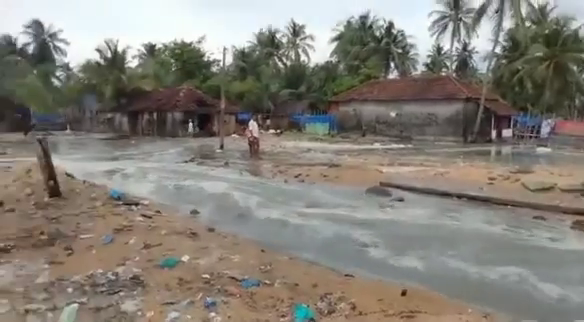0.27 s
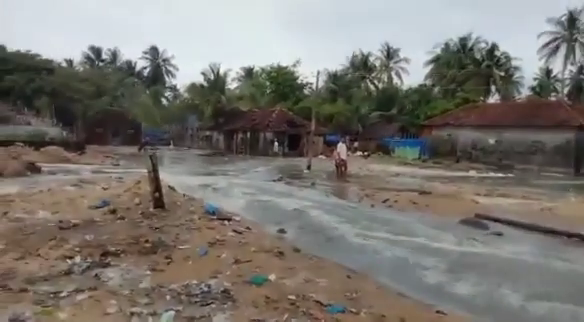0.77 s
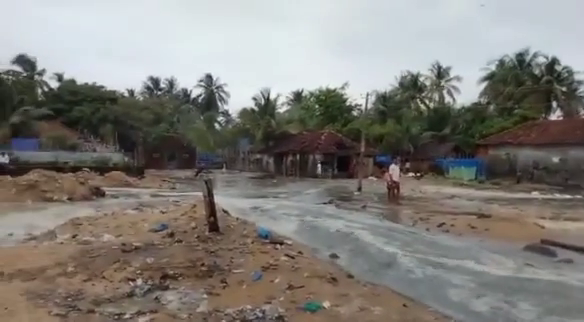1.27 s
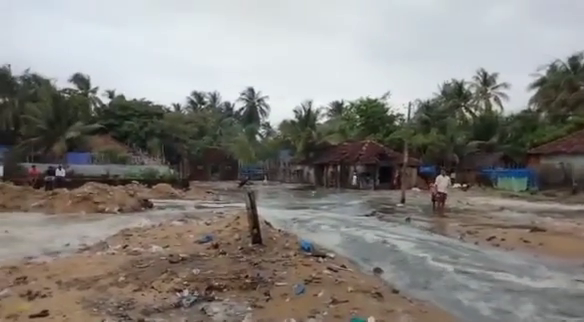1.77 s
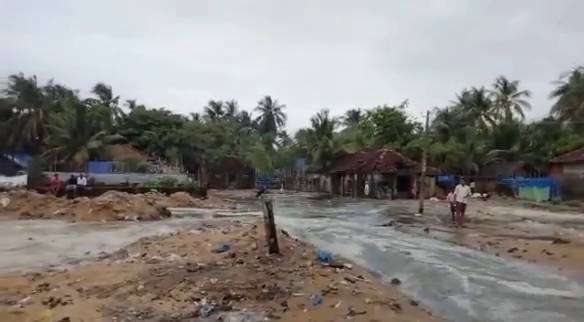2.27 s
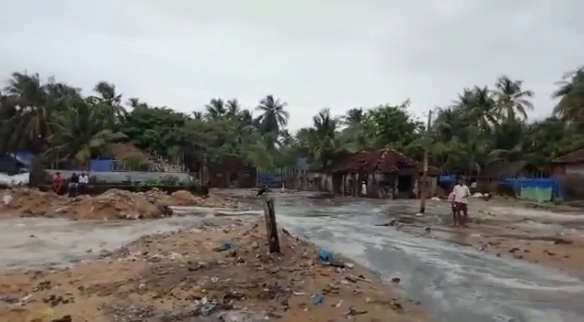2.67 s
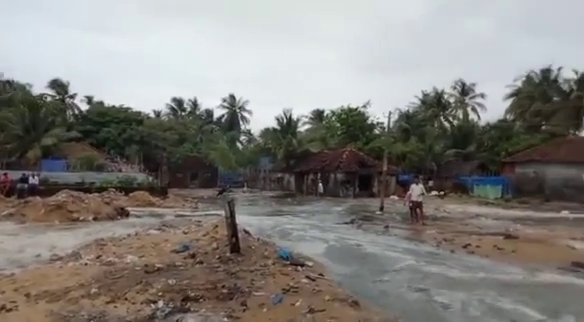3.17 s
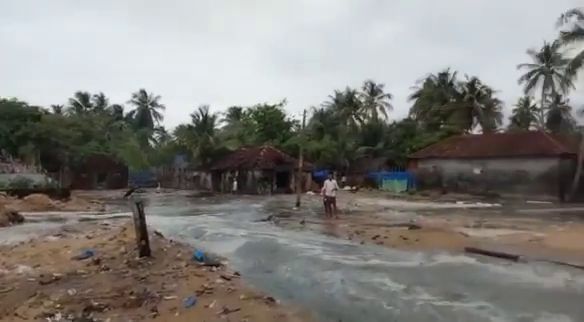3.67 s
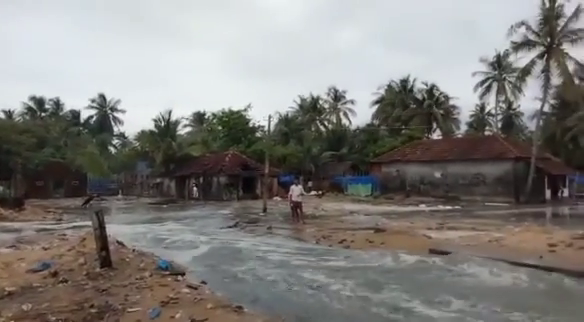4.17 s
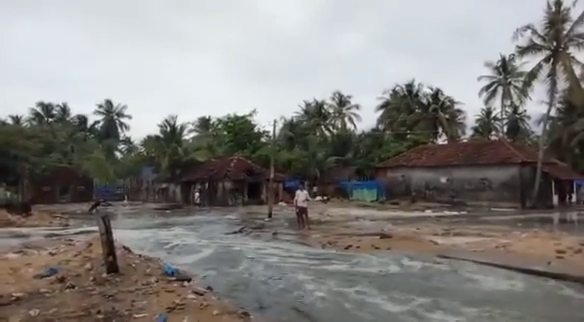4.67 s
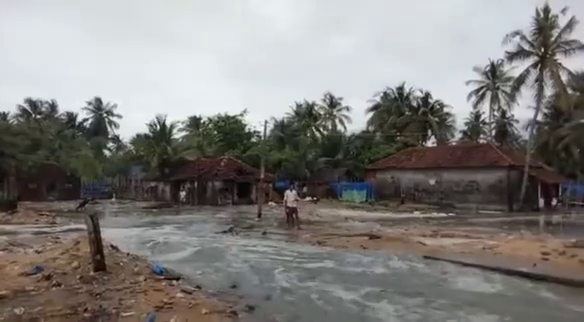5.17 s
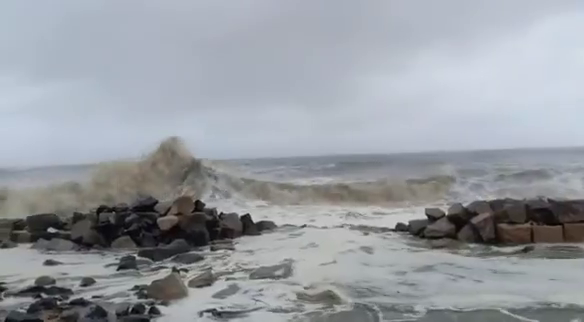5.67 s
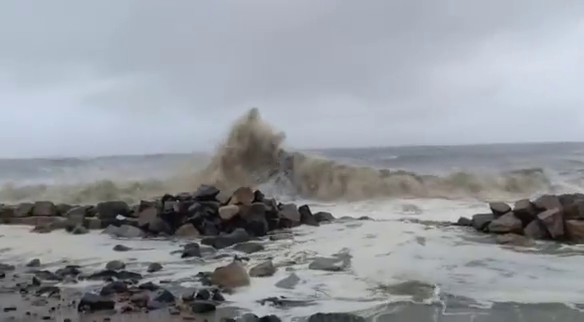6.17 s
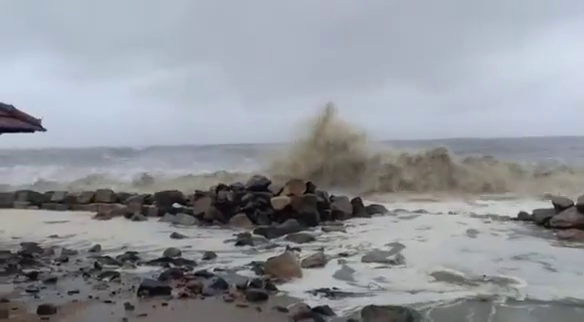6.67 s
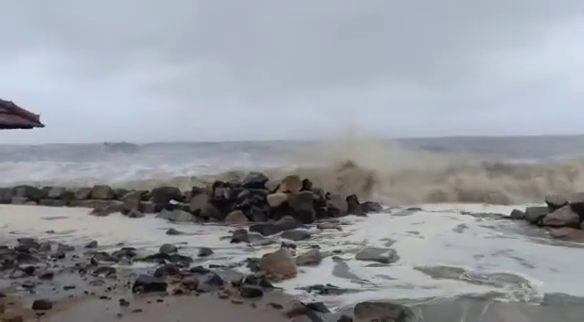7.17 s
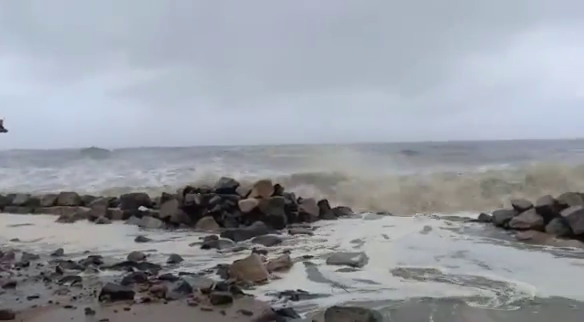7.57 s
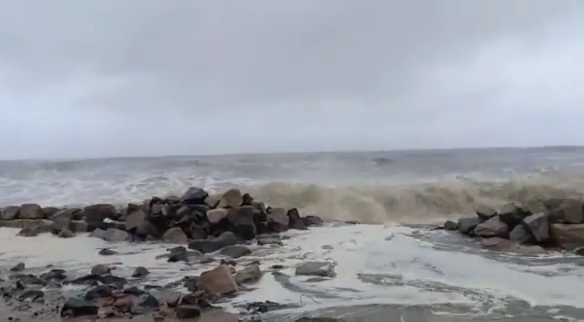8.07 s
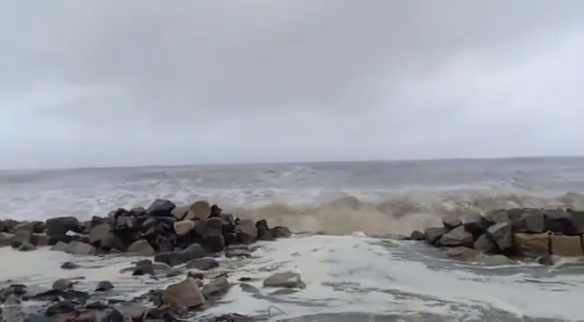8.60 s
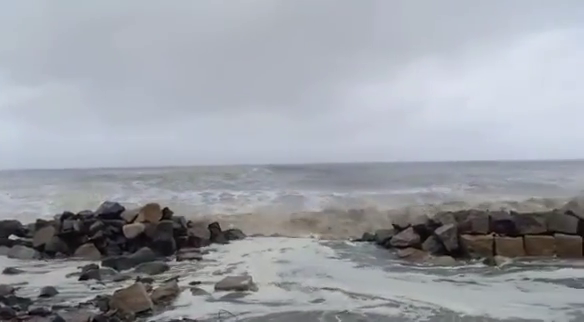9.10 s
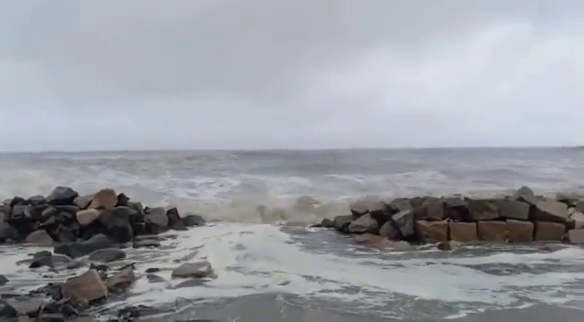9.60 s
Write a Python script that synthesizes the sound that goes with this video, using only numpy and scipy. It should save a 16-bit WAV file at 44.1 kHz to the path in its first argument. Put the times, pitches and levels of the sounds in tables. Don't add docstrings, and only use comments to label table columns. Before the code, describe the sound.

A wave surges and hisses over sand while a crow caws five times, then an abrupt cut to a duller, wind-rumbled roar of distant surf.

```python
import sys
import numpy as np
from scipy import signal
from scipy.fft import rfft, irfft, next_fast_len
from scipy.io import wavfile
from scipy.ndimage import uniform_filter1d

SR = 44100
rng = np.random.default_rng(int(sys.argv[2]) if len(sys.argv) > 2 else 0)


def gain_from_decibels(decibels):
    exponent = np.asarray(decibels, float) / 20
    return 10 ** exponent


def digitize_waveform(pressure):
    field = np.atleast_2d(pressure).T
    bounded = np.clip(field, -1, 1)
    quanta = np.round(bounded * 32767).astype(np.int16)
    wavfile.write(sys.argv[1], SR, quanta)


N = 433944
CUT_S = 5.218
TURN_S = 5.3
COARSE = 64


def wave():
    # f/Hz, density/dB per Hz
    colour = [(25, -33), (48, -26.5), (117, -3), (190, -0.5), (300, -3), (700, -10.5), (2150, -10),
              (3740, -15.5), (5000, -24.5), (6800, -31.5), (8250, -26), (12800, -40.5), (14800, -42),
              (15800, -41.5)]
    # low f/Hz, high f/Hz
    bands_hz = [(60, 160), (200, 480), (600, 1100), (2700, 4600), (6500, 9500), (10500, 15500)]
    top_hz = 15900
    size = next_fast_len(int(TURN_S * SR))
    hz = np.maximum(np.arange(size // 2 + 1) * SR / size, 1)
    spectrum = foam(size, burst_db=0.88) * gain_from_decibels(on_log(hz, colour)) * (hz < top_hz)
    t = np.arange(size) / SR
    x = surf(spectrum[None], hz, wave_levels(), bands_hz, t, shared_db=.5, flicker_db=.7, gusty_db=1.0)
    return np.pad(x[0], (0, N - size))


def wave_levels():
    # t/s, force over calm water/dB
    surge = [(0.0, -7), (1.55, -5), (1.85, 3), (2.08, 5), (2.22, 10.5), (2.36, 10.5), (2.73, 14.5),
             (2.9, 15), (3.12, 16), (3.3, 14), (3.45, 12.5), (3.8, 11.5), (4.1, 9.5), (4.4, 2.5),
             (4.7, -5.5), (5.2, -9)]
    # calm level/dB, level at force 0/dB, gain/dB per dB of force, lead/s, backwash level/dB
    layers = [
        (-47, -50.5, 0.68, .1, -60),
        (-40.5, -37, .9, .03, -47),
        (-41.5, -44, 1.0445, -0.055, -44.5),
        (-42.5, -42, 1.07, -0.0003, -33.5),
        (-55, -50.5, 1.047, -0.018, -52.5),
        (-63, -61, 1.3, 0.074, -72),
    ]
    # t/s, boom level/dB, spray level/dB
    slaps = [(.14, -35, -71), (.46, -35.5, -60), (.88, -29.5, -58), (1.1, -23.5, -68), (1.28, -28, -71),
             (1.56, -25.5, -67), (1.7, -25, -51.5), (1.84, -33, -41), (2.08, -29.5, -42.5), (2.2, -32, -41),
             (2.58, -32, -36), (2.99, -28.5, -48), (3.88, -43, -53), (4.43, -40, -64), (5.03, -33.5, -54)]
    slap_rise_db_s, slap_fall_db_s = 91, 36
    slap_mist_db = -9.5
    backwash_s, backwash_rise_db_s = 4.94, 6.5
    s = np.arange(0, TURN_S, .01)
    drain = peak(s, backwash_s, 0, backwash_rise_db_s, 0)
    surge_s, surge_db = np.transpose(surge)
    levels = []
    for calm, base, share, lead, back in layers:
        force = np.interp(s + lead, surge_s, surge_db)
        levels.append(together(calm, base + share * force, back + drain))
    boom, *middle, spray, mist = levels
    booms = [peak(s, when, db, slap_rise_db_s, slap_fall_db_s) for when, db, _ in slaps]
    sprays = [peak(s, when, db, slap_rise_db_s, slap_fall_db_s) for when, _, db in slaps]
    boom = together(boom, *booms)
    mist = together(mist, *[db + slap_mist_db for db in sprays])
    spray = together(spray, *sprays)
    return np.transpose([s, boom, *middle, spray, mist])


def sea():
    # f/Hz, density/dB per Hz
    colour = [(25, -37), (60, -8), (110, -1), (230, -7), (370, -14.5), (640, -12.5), (1500, -23),
              (1950, -20), (2550, -18), (3400, -29), (4300, -29), (5400, -27.5), (7000, -39), (9700, -51)]
    # low f/Hz, high f/Hz
    bands_hz = [(40, 250), (400, 1000), (1700, 3000), (4000, 7500)]
    # f/Hz, width/Hz, level/dB
    port_rings = [(11400, 700, 7), (13500, 800, 9), (15300, 500, 6)]
    # f/Hz, power share heard alike, power share from the right, left minus right level/dB
    ports = [(60, 0.93, 0.076, 0.5), (250, 0.95, 0.0054, 1), (448, 0.76, 0.0033, -0.5),
             (880, 0.64, 0.19, 0.5), (1400, 0.1, 0.32, 0), (2430, 0.064, 0.21, 2), (4360, 0, 0.23, 0),
             (5730, 0.081, 0.16, -9.5), (7000, 0, 0.12, -4.5), (9000, 0.031, .12, -1)]
    port_lag_s, top_hz = .000488, 15500
    first = int(TURN_S * SR)
    size = next_fast_len(N - first)
    hz = np.maximum(np.arange(size // 2 + 1) * SR / size, 1)
    alike = np.clip(on_log(hz, ports, axis=1), 0, 1)
    lateral = np.clip(on_log(hz, ports, axis=2), 0, 1)
    apart = np.sqrt(np.clip(1 - alike - lateral, 0, 1))
    front = np.sqrt(alike) * foam(size, burst_db=0.8)
    right = np.sqrt(lateral) * foam(size, burst_db=1.1)
    late = right * np.exp(-2j * np.pi * hz * port_lag_s)
    left_port = front + late + apart * foam(size, burst_db=1.8)
    right_port = front + right + apart * foam(size, burst_db=0.0)
    colour_db = on_log(hz, colour)
    for ring_hz, width_hz, db in port_rings:
        colour_db = colour_db + db / (1 + (2 * (hz - ring_hz) / width_hz) ** 2)
    balance_db = np.outer([.5, -.5], on_log(hz, ports, axis=3))
    ears = np.array([left_port, right_port]) * (hz < top_hz) * gain_from_decibels(colour_db + balance_db)
    t = (first + np.arange(size)) / SR
    x = surf(ears, hz, sea_levels(), bands_hz, t, shared_db=.4, flicker_db=.6, gusty_db=1.3)
    return np.pad(x[:, :N - first], ((0, 0), (first, 0)))


def sea_levels():
    # t/s, force/dB, wind level/dB
    breakers = [(5.6, 0.5, -35.5), (5.84, 0, -31.5), (6.2, 1.5, -34), (6.5, 2, -33.5), (6.8, 4.5, -32.5),
                (7.04, 2, -32), (7.24, 2, -29.5), (7.7, 1, -31), (8.24, -0.5, -31), (8.44, 0, -29),
                (8.64, 0, -32.5), (9.0, -1, -29.5), (9.3, 0, -31.5), (9.62, -0.5, -28.5), (9.84, 1.5, -31)]
    # level at force 0/dB, gain/dB per dB of force
    layers = [
        (-42.5, 1.07),
        (-42.5, 0.84),
        (-49, 1.2),
    ]
    s, force, wind_db = np.transpose(breakers)
    return np.transpose([s, wind_db] + [base + share * force for base, share in layers])


def surf(spectra, hz, curves, bands_hz, t, shared_db, flicker_db, gusty_db):
    s, *levels = np.transpose(curves)
    power = np.mean(np.abs(spectra) ** 2, axis=0) * 2 / len(t) ** 2
    own_db = [10 * np.log10(power[(hz > lo) & (hz < hi)].sum()) for lo, hi in bands_hz]
    gains_db = np.array(levels) - np.array(own_db)[:, None]
    centres = np.log2(25) + np.arange(30) / 3
    heave = uniform_filter1d(walk(3, count=30), size=7, axis=0) * np.sqrt(7)
    flicker = walk(14, count=30)
    gust = walk(22, count=1)[0]
    coarse_s = np.arange(heave.shape[1]) * COARSE / SR
    curve = np.arange(len(levels))
    band_octaves = np.log2(bands_hz).mean(axis=1)
    out = 0
    for k, c in enumerate(centres):
        place = np.clip(1 - np.abs(curve - np.interp(c, band_octaves, curve)), 0, 1)
        bass = np.clip(np.log2(400) - c, 0, 1)
        wobble = shared_db * heave[k] + flicker_db * flicker[k] + gusty_db * gust * bass
        gain = np.interp(t, coarse_s, gain_from_decibels(np.interp(coarse_s, s, place @ gains_db) + wobble))
        window = np.cos(np.pi / 2 * np.clip(3 * (np.log2(hz) - c), -1, 1)) ** 2
        out = out + gain * irfft(spectra * window, len(t))
    return out


def foam(size, burst_db):
    patches = np.repeat(rng.exponential(1, size // 32 + 1), 32)[:size]
    patches = uniform_filter1d(patches, 32)
    return rfft(rng.standard_normal(size) * gain_from_decibels(burst_db * patches))


def walk(rate, count):
    k = int(SR / rate / COARSE)
    w = np.repeat(rng.standard_normal((count, N // COARSE // k + 2)), k, axis=1)
    w = uniform_filter1d(uniform_filter1d(w, k), k)
    return w[:, :N // COARSE + 1] / w.std()


def on_log(hz, table, axis=1):
    table = np.array(table, float)
    return np.interp(np.log(hz), np.log(table[:, 0]), table[:, axis])


def together(*levels_db):
    return 10 * np.log10(sum(gain_from_decibels(db) ** 2 for db in levels_db))


def peak(s, when, db, rise, fall):
    return db - np.where(s < when, abs(rise) * (when - s), abs(fall) * (s - when))


def crows():
    # t/s, length/s, top pitch f/Hz, top level/dB, strong-weak cycle share
    caws = [
        (1.68, .255, 494, -26, .6),
        (2.355, .205, 480, -27, .1),
        (2.98, .24, 490, -26.5, .3),
        (3.635, .28, 472, -23.3, .45),
        (4.715, .285, 486, -23, .18),
    ]
    top_share = 0.535
    slack_in, slack_out = (.07, 8, .14), (.16, 4, .1)
    long_caw_s = .285
    rattle_per_pitch, rattle_depth, rattle_bend, rasp_depth = .163, .6, .2, .7
    out = np.zeros(N)
    for s, length, top_hz, top_db, share in caws:
        i = np.arange(int(s * SR), int((s + length) * SR))
        u = (i - i[0]) / len(i) - top_share
        slack = np.where(u < 0, u / top_share, u / (1 - top_share)) ** 2
        flat, soft, shut = slack * np.where(u < 0, np.c_[slack_in].T, np.c_[slack_out].T)
        hz = top_hz * (1 - flat * (length / long_caw_s) ** 2)
        db = top_db - soft
        halves = share * (1 - slack)
        # 1900 Hz at -23 dB, 95 Hz more per dB
        throat_hz = (1900 + 95 * (top_db + 23)) * (1 - shut)
        rasp = uniform_filter1d(rng.standard_normal((2, SR // 2)), size=150)
        rasp = uniform_filter1d(rasp, size=40)[:, :len(i)] * np.sqrt(150)
        turn = 2 * np.pi * np.cumsum(hz) / SR
        rattle = np.cos(rattle_per_pitch * turn + rasp_depth * rasp[0])
        turn = turn + rattle_bend * rattle + .09 * rasp[1]
        voice = 0
        for k in range(2, 9):
            throat = 1 / (1 + ((k * hz - throat_hz) / 330) ** 2)
            beak = .12 / (1 + ((k * hz - 2450) / 200) ** 2)
            voice = voice + np.sin(k * turn) * min(k / 3, 1) ** 2 * (throat + beak)
        voice *= (1 + rattle_depth * rattle) * (1 + halves * np.cos(turn / 2))
        edge = np.clip(np.minimum(i - i[0], i[-1] - i) / (0.024 * SR), 0, 1)
        out[i] += gain_from_decibels(db) * edge * voice / voice.std()
    return out


def birds():
    starts_s = [.04, .235, 4.15, 1.825, 1.84, 1.825, 6.93]
    # length/s, first f/Hz, last f/Hz, level/dB, breathy wander/Hz
    whistles = [
        (.18, 3800, 3780, -42, 15),
        (.07, 3650, 3600, -41, 15),
        (.16, 3720, 3680, -35, 15),
        (.065, 2900, 3350, -27, 180),
        (.055, 3750, 3900, -28, 150),
        (.03, 510, 520, -22, 10),
        (.05, 3850, 3950, -46, 30),
    ]
    out = np.zeros(N)
    for s, (length, first_hz, last_hz, db, wander_hz) in zip(starts_s, whistles):
        u = np.linspace(0, 1, int(length * SR))
        wander = uniform_filter1d(rng.standard_normal(SR // 4), size=60)[:len(u)] * np.sqrt(60)
        hz = first_hz + (last_hz - first_hz) * u + wander_hz * wander
        swell = np.sqrt(np.abs(np.sin(np.pi * u)))
        out[int(s * SR):][:len(u)] += gain_from_decibels(db) * swell * np.sin(2 * np.pi * np.cumsum(hz) / SR)
    return out


def drips():
    starts_s = [.08, .44, 1.42, 4.227, 9.741, 9.739]
    # f/Hz, glide share, ring t60/s, level/dB
    drops = [
        (5600, .05, .03, -39),
        (2250, .05, .06, -32),
        (1600, .1, .04, -27),
        (2200, .1, .015, -18),
        (2100, .06, .15, -36),
        (2150, .02, .025, -27.5),
    ]
    out = np.zeros(N + SR)
    t = np.arange(SR // 8) / SR
    for s, (hz, glide, t60, db) in zip(starts_s, drops):
        ring = np.sin(2 * np.pi * hz * (t + glide * t * t / t60)) * np.exp(-np.log(1000) * t / t60)
        crack = 2.5 * np.sin(2 * np.pi * 1.4 * hz * t) * np.exp(-t / .0004)
        out[int(s * SR):][:len(t)] += gain_from_decibels(db) * (ring + crack)
    return out[:N]


def gurgle():
    bubbles_per_s, softest_db, spread_db = 45, -45, 7
    out = np.zeros(N)
    t = np.arange(SR // 16) / SR
    swell = t / .004
    for when, size, blow in rng.random((int(bubbles_per_s * CUT_S), 3)):
        hz = 1400 * 2 ** (1.1 * size)
        ring = swell * np.exp(1 - swell) * np.sin(2 * np.pi * hz * (t + 1.5 * t * t))
        out[int(when * CUT_S * SR):][:len(t)] += gain_from_decibels(softest_db + spread_db * blow) * ring
    return out


def dulled(x):
    return lambda order: signal.sosfilt(signal.butter(order, 6000, fs=SR, output="sos"), x)


def scene():
    start_s, fade_s = 5.348, 0.25
    t = np.arange(N) / SR
    calls = dulled(crows() + birds())(4)
    houses = gain_from_decibels(-11) * np.roll(calls, int(.031 * SR))
    trees = gain_from_decibels(-15) * np.roll(calls, int(.074 * SR))
    small_sounds = calls + houses + trees + dulled(drips())(2)
    beach = np.clip((CUT_S - t) / 0.00085, 0, 1)
    seawall = np.clip((t - start_s) / fade_s, 0, 1) ** 0.88
    return beach * (wave() + gurgle()) + seawall * sea() + (beach + seawall) * small_sounds


def top_cut(x):
    return signal.sosfilt(signal.butter(12, 16510, fs=SR, output="sos"), x)


def record(dry):
    return top_cut(dry)


dry = scene()
out = record(dry)
digitize_waveform(out)
```